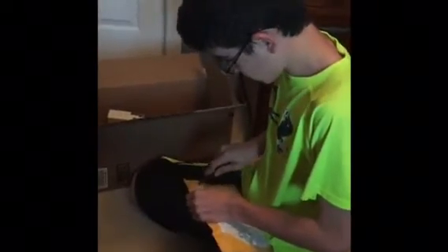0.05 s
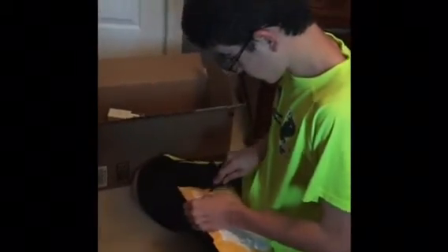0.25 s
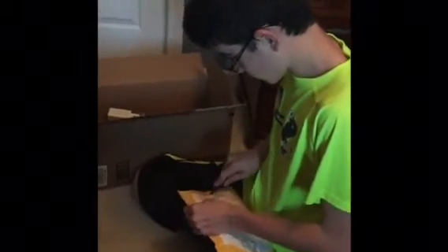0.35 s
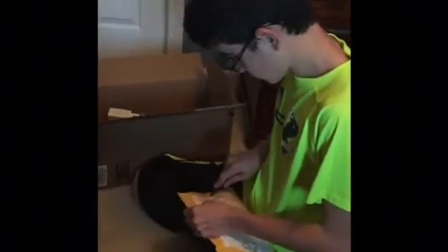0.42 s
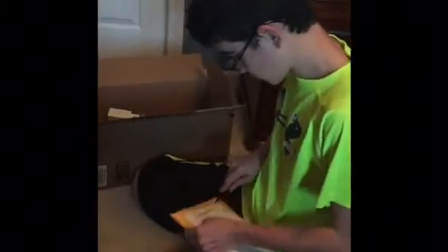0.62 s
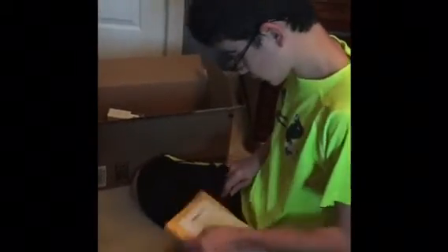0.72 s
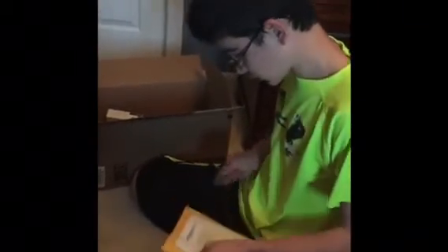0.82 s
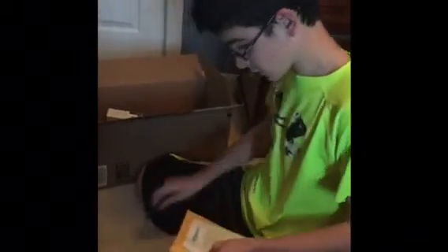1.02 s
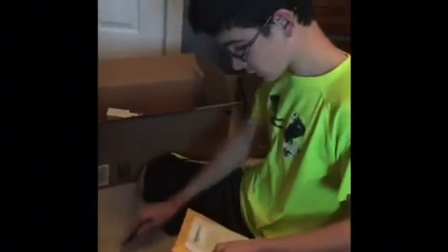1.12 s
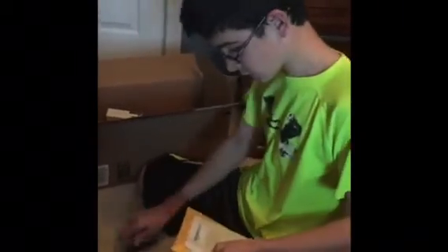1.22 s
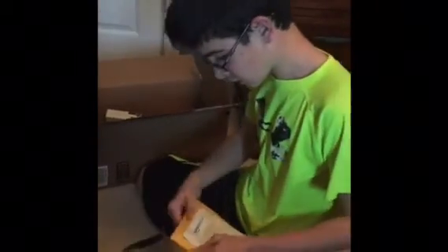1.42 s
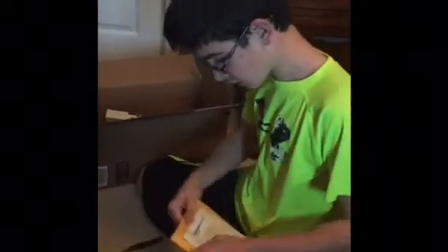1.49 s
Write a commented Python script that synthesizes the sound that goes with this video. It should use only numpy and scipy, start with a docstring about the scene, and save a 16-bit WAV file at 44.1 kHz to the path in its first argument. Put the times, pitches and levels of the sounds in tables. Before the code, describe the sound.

A small blade tears a stiff paper mailer in three quick clusters of scratchy rips and crease pops, then a sleeve swishes, a light knock sounds and a hand settles softly; close microphone, small carpeted room.

```python
"""A small knife slits a paper mailer in a few short tugs, in a small carpeted room.
Each tug is a rush of random fibre snaps, filtered as the stiff sheet, the torn edge and the pouch.
Creases pop as short falling tones with a noisy crack; the pouch bumps and the blade scratches in between.
Then filtered noise makes an arm sweep over clothing, a light knock as the knife is put down,
and a hand settling on the floor. Resonances, echoes and a quiet background lie around it."""
import sys
import numpy as np
from scipy import signal
from scipy.io import wavfile
from scipy.ndimage import uniform_filter1d

SR = 44100
rng = np.random.default_rng(int(sys.argv[2]) if len(sys.argv) > 2 else 0)


def dump_mix(stems):
    """Bounce the given channels to the path in sys.argv[1] as a 16-bit WAV at rate SR."""
    frames = np.atleast_2d(stems).T  # one column per channel
    limited = np.clip(frames, -1, 1)  # hard clip at full scale
    pcm = np.round(limited * 32767).astype(np.int16)
    wavfile.write(sys.argv[1], SR, pcm)


N = 68355
TIME = np.arange(N) / SR  # seconds

# The bright fizz of torn fibres, also used for the tick of paper: f/Hz, level/dB
FIZZ_SPECTRUM = [(500, -32), (2000, -9.5), (3800, 2), (5200, -2.5), (7000, -0.5), (8800, -1), (10200, -6),
                 (11900, -3), (13500, -14), (16000, -5)]


def amp(db):
    """Turn decibels into a plain gain."""
    return 10 ** (np.asarray(db) / 20)


def evened(x):
    """Scale a sound to an average (RMS) strength of one."""
    return x / np.sqrt(np.mean(x ** 2) + 1e-20)


def read(points, hz):
    """Read a curve over frequency, joined by straight lines on a log-frequency axis."""
    f, value = np.transpose(points)
    return np.interp(np.log(hz + 1), np.log(f + 1), value)


def level(points):
    """Gain over time along a curve of t/s, level/dB."""
    return amp(np.interp(TIME, *np.transpose(points)))


def colour(x, points, size=4096):
    """Filter with the given spectrum, with no sound ahead of its cause and with unit energy."""
    hz = abs(np.fft.fftfreq(size, 1 / SR))
    log_gain = np.log(amp(read(points, hz)))
    # The Hilbert transform finds the phase that puts the response as early as possible
    response = np.exp(np.conj(signal.hilbert(log_gain)))
    taps = np.fft.ifft(response).real[:size // 2]
    return signal.fftconvolve(x, taps / np.linalg.norm(taps))[:N]


def background():
    """Steady, mostly low noise: the quiet background of the room."""
    # f/Hz, level/dB
    background_spectrum = [(20, -16), (50, -5.5), (90, 2), (170, -3.5), (300, -7), (600, -12.5),
                           (1200, -16.5), (4000, -28), (16000, -44)]
    return amp(-71) * colour(rng.standard_normal(N), background_spectrum)


def room(x, size=22000):
    """Dense random reflections of a small room, the treble dying first."""
    # Time for the echoes to fall by 60 dB: f/Hz, time/s
    echo_times = [(100, 0.47), (400, 0.26), (1000, 0.21), (3000, .24), (8000, 0.16), (16000, 0.13)]
    delay_s = 0.004
    reflections = rng.choice([-1., 1.], size) * (rng.random(size) < .1) * (TIME[:size] > delay_s)
    hz, t, bands = signal.stft(reflections, SR, nperseg=256)
    fade = amp(-60 * t / read(echo_times, hz)[:, None])
    tail = signal.istft(bands * fade, SR, nperseg=256)[1]
    return signal.fftconvolve(x, tail / np.linalg.norm(tail))[:N]


def resonate(x):
    """A few fixed resonances of room and microphone ring on after the tearing."""
    # f/Hz, level/dB, time to fall by 60 dB/s
    resonance_tones = [(667.6, 1, 0.18), (904, -9, .12), (1095, -1, 0.2), (1960, -9, 0.13)]
    ring_db = -16  # compared with the sound that sets it off
    t = TIME[:SR // 4]
    tones = sum(amp(db - 60 * t / t60) * np.cos(2 * np.pi * hz * t) for hz, db, t60 in resonance_tones)
    ringing = evened(signal.fftconvolve(x, tones)[:N])
    return x + amp(ring_db) * ringing * np.std(x)


def settle():
    """The hand settles on the carpet: soft, low noise that swells and fades."""
    # Loudness curve: t/s, level/dB
    settle_curve = [(1.33, -92), (1.378, -55.5), (1.408, -56.5), (1.445, -76.5), (1.55, -71)]
    # f/Hz, level/dB
    carpet_spectrum = [(25, -15), (55, -1.5), (100, -11.5), (145, 2.5), (250, -12.5), (400, -17),
                       (700, -34), (4000, -57)]
    return colour(rng.standard_normal(N) * level(settle_curve), carpet_spectrum)


def swish():
    """The arm brushes over cloth: noise that follows the strength of the rubbing."""
    # Loudness curve: t/s, level/dB
    swish_curve = [(.92, -66), (1.01, -65.5), (1.1, -58.5), (1.235, -55.5), (1.29, -58.5), (1.33, -66),
                   (1.43, -69), (1.55, -72.5)]
    # f/Hz, level/dB
    cloth_spectrum = [(60, -31), (300, -3), (520, -8.5), (680, 4), (850, -6), (1400, 2.5), (2700, -2),
                      (4000, -5.5), (8500, -7.5), (16000, -14.5)]
    return colour(rng.standard_normal(N) * level(swish_curve), cloth_spectrum)


def burst(start, db, decay):
    """A sudden contact: noise that starts at once and dies away."""
    t = np.maximum(TIME - start, 0)
    return amp(db) * (t > 0) * np.exp(-t / decay) * rng.choice([-1., 1.], N)


def knock_and_tick():
    """A light hollow knock as the knife is put down, then a faint tick of paper."""
    # f/Hz, level/dB
    knock_spectrum = [(100, -38), (500, -11.5), (850, -3), (1250, -8), (1550, -1.5), (2100, -12),
                      (2900, -8), (4000, -26), (16000, -38)]
    knock = burst(start=1.2485, db=-35, decay=0.0048)
    tick = burst(start=1.483, db=-58, decay=.004)
    return colour(knock, knock_spectrum) + colour(tick, FIZZ_SPECTRUM)


def bumps(rise_s=0.0029):
    """Dull thumps of the pulled pouch: quickly damped tones with a soft start."""
    # t/s, level/dB, f/Hz, decay/s
    bump_list = [(0.144, -39, 225, 0.0055), (0.251, -40.5, 207, 0.016), (.340, -29, 210, 0.0096),
                 (.287, -42.5, 200, 0.016), (0.383, -46.5, 101.6, 0.032), (0.639, -40, 208.7, 0.021),
                 (.697, -31, 213.3, 0.014), (0.706, -51, 95.3, 0.047), (.833, -30, 541, 0.0041),
                 (0.837, -47.5, 87.6, 0.05)]
    out = np.zeros(N)
    for start, db, hz, decay in bump_list:
        t = np.maximum(TIME - start, 0)
        shape = (1 - np.exp(-t / rise_s)) * np.exp(-t / decay)
        out += amp(db) * shape * np.sin(2 * np.pi * hz * t)
    return out


def fibres():
    """Fibres give way at random, in clumps, a few much harder than the rest."""
    snaps_per_s, spread_db = 6000, 4
    clump_db, clump_s = 2, 0.0024
    size = amp(spread_db * np.minimum(rng.exponential(1, N), 4)) * rng.choice([-1., 1.], N)
    snaps = size * (rng.random(N) < snaps_per_s / SR)
    # Divide by the local strength, so that only the clumps below vary it
    steady = snaps / np.sqrt(abs(uniform_filter1d(snaps ** 2, size=300)) + 1e-3)
    clumps = evened(uniform_filter1d(rng.standard_normal(N), max(2, int(clump_s * SR))))
    return evened(steady * amp(clump_db * clumps))


def squeak():
    """The blade squeaks briefly as it bites: fibre snaps kept to a narrow band."""
    # Loudness curve: t/s, level/dB
    squeak_curve = [(.57, -79), (.605, -57), (.628, -48), (.65, -87)]
    centre_hz, width_hz = 1880, 510
    edges = [centre_hz - width_hz / 2, centre_hz + width_hz / 2]
    band = signal.butter(2, edges, "band", fs=SR, output="sos")
    narrow = signal.sosfilt(band, fibres())
    biting = (TIME > squeak_curve[0][0]) & (TIME < squeak_curve[-1][0])
    return evened(narrow) * level(squeak_curve) * biting


def drag():
    """The blade drags and the paper slides: a fine scratching made of fibre snaps."""
    # Loudness curve: t/s, level/dB
    drag_curve = [(0, -85), (.045, -67), (.085, -52), (.13, -50.5), (.185, -49.5), (.21, -56.5),
                  (.228, -45), (.27, -50), (.32, -49), (.41, -40.5), (.47, -77), (.57, -77), (.615, -55.5),
                  (.64, -45), (.73, -44), (.78, -50.5), (.803, -44), (.865, -45), (.91, -59.5),
                  (1.0, -64.5), (1.2, -92)]
    # f/Hz, level/dB
    drag_spectrum = [(100, -25), (220, -5), (450, -12), (750, -1.5), (1100, 0), (1500, -4.5), (2300, -4),
                     (4000, -10.5), (6200, -10), (10000, -15), (16000, -24)]
    return colour(fibres() * level(drag_curve), drag_spectrum)


def pops():
    """A crease buckles: a sharp ringing crack and a few swings of the sheet, falling in pitch."""
    # t/s, swing level/dB, crack level/dB, pitch the swing falls to: f/Hz
    pop_list = [(.018, -40.5, -55, 794), (.0972, -23, -43, 772), (.218, -26.5, -23, 843),
                (.2858, -22, -29, 820), (.6965, -15.5, -15, 698), (0.7146, -26, -25, 1440),
                (.76, -31, -44, 830), (.852, -25, -26, 900), (.8675, -33, -39, 1400)]
    # Ringing of each crack: f/Hz, level/dB, decay/s
    crack_tones = [(1800, -1.5, 0.00072), (3340, -3.5, 0.00078), (6520, -1.5, 0.00052)]
    rise_s, decay_s = 0.0009, .0014
    # Bending waves bring their higher pitches first: extra pitch (a share) and how fast it goes
    chirp, chirp_s = 0.75, 0.00074
    flex, crack = np.zeros(N), np.zeros(N)
    for start, flex_db, crack_db, hz in pop_list:
        t = np.maximum(TIME - start, 0)
        turns = hz * (t + chirp * chirp_s * (1 - np.exp(-t / chirp_s)))
        shape = (1 - np.exp(-t / rise_s)) * np.exp(-t / decay_s)
        flex += 2 * amp(flex_db) * shape * np.sin(2 * np.pi * turns)
        ringing = sum(amp(db) * np.exp(-t / decay) * np.sin(2 * np.pi * f * t)
                      for f, db, decay in crack_tones)
        crack += amp(crack_db) * ringing
        crack += burst(start, crack_db - 18, decay=0.00077)
    low_cut = signal.butter(2, 248, "high", fs=SR, output="sos")  # Hz
    return signal.sosfilt(low_cut, flex + crack)


def rips():
    """Each tug swells, holds and lets go; its snaps sound in the sheet, the torn edge and the pouch."""
    # Tugs of the blade: t/s, length/s, sheet level/dB, fizz level/dB, pouch level/dB
    tugs = [(0.094, 0.0013, -37, -37.5, -63.5), (0.135, 0.012, -43, -44, -67),
            (0.278, 0.017, -36, -42.5, -56.5), (0.3326, 0.015, -23, -30.5, -45),
            (0.344, 0.029, -32, -43, -43.5), (.370, .027, -30.5, -35, -44),
            (0.632, 0.026, -32, -36.5, -51.5), (.666, 0.01, -32, -38, -42),
            (0.677, 0.019, -36, -40.5, -53.5), (0.697, 0.017, -35, -42.5, -44.5),
            (0.824, 0.0056, -31.5, -28, -48), (.832, 0.011, -41, -64, -41.5),
            (0.841, 0.012, -31, -37, -44.5)]
    # What gives off each snap: f/Hz, level/dB
    sheet_spectrum = [(100, -39), (300, -13.5), (470, -13.5), (680, 1), (900, 0), (1120, -2.5),
                      (1450, -7.5), (1900, -7), (2900, -11), (4200, -15), (6500, -30), (16000, -52)]
    pouch_spectrum = [(30, -42), (60, -23), (95, -4), (140, -10), (205, -2), (270, -3), (520, -4.5),
                      (900, -26.5), (4000, -55)]
    attack_s, release_s = 0.0038, 0.0044
    power = np.zeros((3, N))  # sheet, fizz, pouch
    for start, length, *db in tugs:
        t = TIME - start
        swell = np.clip(t / attack_s, 0, 1)
        let_go = np.exp(-np.maximum(t - length, 0) / release_s)
        power += (amp(db)[:, None] * swell * let_go) ** 2
    sheet, fizz, pouch = np.sqrt(power)
    sheet_sound = colour(fibres() * sheet, sheet_spectrum)
    fizz_sound = colour(fibres() * fizz, FIZZ_SPECTRUM)
    return sheet_sound + fizz_sound + colour(fibres() * pouch, pouch_spectrum)


def scene():
    """Paper and cloth over the quiet background; tearing, pops, knock and tick also echo."""
    tearing = resonate(rips() + drag() + squeak())
    sharp = pops() + knock_and_tick()
    echo = room(amp(-11) * tearing + amp(-10.5) * sharp)
    return (tearing + sharp + echo + bumps() + swish() + settle() + background())[None]


def record(dry):
    """The recorder's band limit: a steep filter removes the highest treble."""
    low_pass = signal.firwin(511, 15780, window=("kaiser", 9), fs=SR)  # Hz
    return signal.oaconvolve(dry, low_pass[None], "same")


dry = scene()
out = record(dry)
dump_mix(out)
```